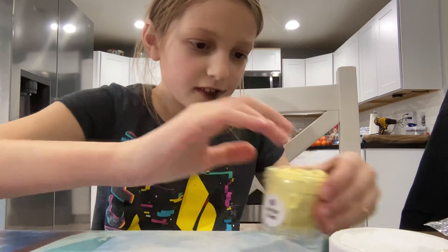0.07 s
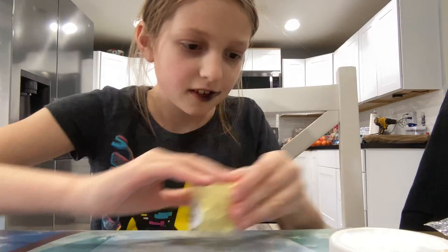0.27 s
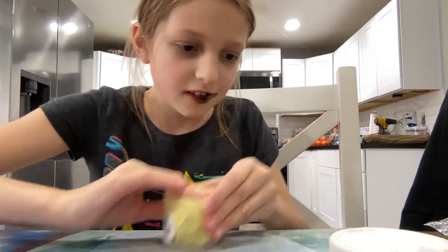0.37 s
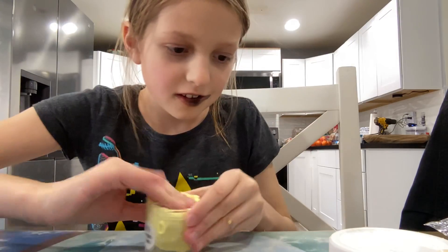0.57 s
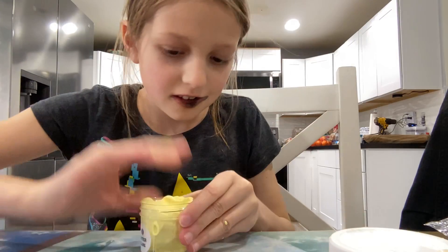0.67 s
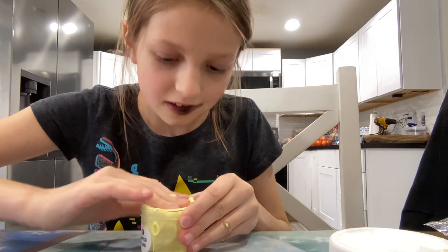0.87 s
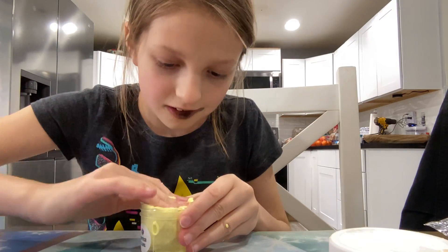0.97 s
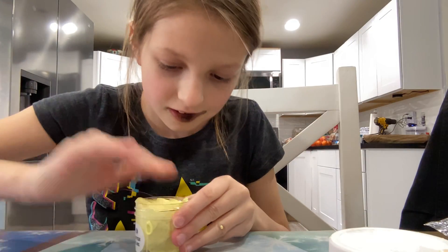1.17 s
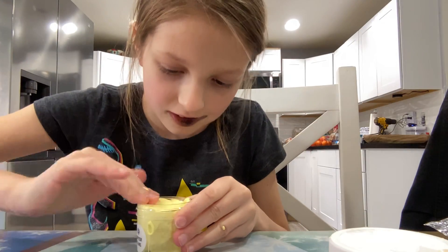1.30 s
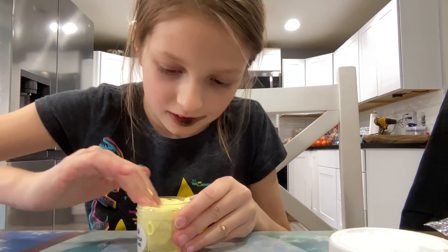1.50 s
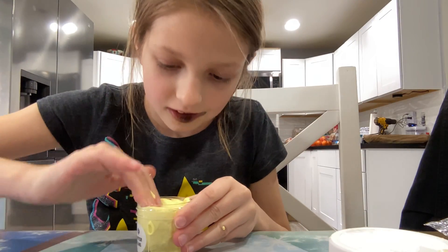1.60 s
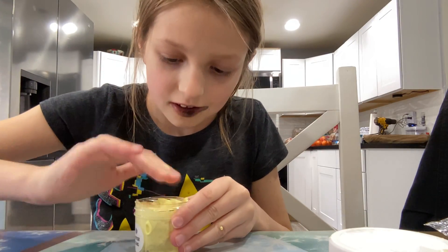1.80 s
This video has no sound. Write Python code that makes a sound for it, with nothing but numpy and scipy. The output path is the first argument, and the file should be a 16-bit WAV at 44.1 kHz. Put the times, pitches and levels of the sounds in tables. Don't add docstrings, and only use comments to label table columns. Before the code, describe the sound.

Close, dry handling of sticky slime in a plastic jar, with crackly pops, a jar landing with a knock and quick clicks, then quiet thuds, peeling rustles and two late clicks over low room hum.

```python
import sys
import numpy as np
from scipy import signal
from scipy.fft import rfft, irfft
from scipy.io import wavfile
from scipy.ndimage import uniform_filter1d

SR = 44100
rng = np.random.default_rng(int(sys.argv[2]) if len(sys.argv) > 2 else 0)


def materialize(psi):
    bounded = np.clip(np.atleast_2d(psi).T, -1, 1)
    quanta = np.round(bounded * 32767).astype(np.int16)
    wavfile.write(sys.argv[1], SR, quanta)


def elevation(decibels):
    levels = np.asarray(decibels, float)
    return 10 ** (levels / 20)


N = 81585
TIME_S = np.arange(N) / SR


def noise():
    return rng.standard_normal(N)


def colour(x, points):
    hz, db = np.array(points, float).T
    f = np.maximum(np.fft.rfftfreq(len(x), 1 / SR), 1)
    low_cut_db = 24 * np.log2(np.maximum(hz[0] / f, 1))
    gain_db = np.interp(np.log(f), np.log(hz), db) - low_cut_db
    y = irfft(rfft(x) * elevation(gain_db), len(x))
    return y / np.sqrt(np.mean(y ** 2))


def fade(start_s, t60_s, rise_s=0.000083):
    since_s = np.maximum(TIME_S - start_s, 0)
    rise = 1 - np.exp(-(since_s / rise_s) ** 2)
    return since_s, rise * np.exp(-np.log(1000) * since_s / t60_s)


def ringing(start_s, hz, db, t60_s, rise_s=0.00011):
    since_s, env = fade(start_s, t60_s, rise_s)
    return elevation(db) * env * np.sin(2 * np.pi * hz * since_s)


def peel_envelope(start_s, rise_s, hold_s, fall_s):
    growth = np.clip((TIME_S - start_s) / rise_s, 0, 1) ** 2
    falling_s = np.maximum(TIME_S - start_s - rise_s - hold_s, 0)
    return growth * np.exp(-3 * falling_s / fall_s)


def walk(rate_hz):
    k = int(SR / rate_hz)
    steps = np.repeat(rng.standard_normal(N // k + 1), k)
    return 0.71 * uniform_filter1d(uniform_filter1d(steps, k), k)[:N]


# start in seconds, peak in dB, jar wall modes in dB.
CLICKS = [
    (0.4383, -19, 2.5),
    (0.4482, -20.5, -26),
    (0.461, -19.5, -7.5),
    (0.5592, -18, -5),
    (1.334, -20, -5.5),
    (1.4257, -21, -6),
]
# frequency in Hz, level in dB, t60 in seconds.
WALL_MODES = [(868, -8, .025), (1140, -8, .022), (1730, -17.5, .02), (2060, -16, .02)]
# frequency in Hz, level in dB, t60 in seconds.
RING_MODES = [(3080, -15, .02), (4500, -22, .012), (5270, -11, .017), (6620, -22, .07), (6740, -15, .02),
              (7630, -16, .02), (8655, -17, .015), (8845, -23, .06), (9730, -24, .04), (10560, -21, .05),
              (11060, -7, .05), (12500, -30, .04), (13250, -17, .022), (14650, -24, .022)]
# frequency in Hz, level in dB.
CRACK_COLOUR = [(750, -7.5), (1300, -17), (2600, -16), (5000, -20), (8500, -3.5), (10500, -18.5),
                (12300, -45.5), (15500, -40.5)]


def ring_clicks():
    rise_s, scatter_db, mode_gain_db = 0.00023, 1.5, -6
    snap_hz, snap_db, snap_t60_s = 10635, 4, 0.0044
    rebound_s, rebound_db = 0.0012, -9
    crack_db, crack_t60_s = -17.5, 0.017
    all_modes = WALL_MODES + RING_MODES
    chance = rng.standard_normal((len(CLICKS), len(all_modes)))
    grit = colour(noise(), CRACK_COLOUR)
    snaps, modes = np.zeros(N), np.zeros(N)
    for (start_s, db, wall_db), luck in zip(CLICKS, chance):
        snaps += ringing(start_s, snap_hz, db + snap_db, snap_t60_s, rise_s)
        snaps += ringing(start_s + rebound_s, snap_hz, db + snap_db + rebound_db, snap_t60_s, rise_s)
        modes += elevation(db + crack_db) * fade(start_s, crack_t60_s, rise_s)[1] * grit
        for k, (hz, mode_db, t60_s) in enumerate(all_modes):
            level_db = db + mode_db + mode_gain_db + scatter_db * luck[k]
            if k < len(WALL_MODES):
                level_db += wall_db
            modes += (-1) ** k * ringing(start_s, hz, level_db, t60_s, rise_s)
    return snaps, modes


# start in seconds, peak in dB, t60 in seconds, low part in dB.
POPS = [(0.2348, -46, 0.025, -11), (0.2369, -23.5, 0.023, -13.5), (0.2393, -27, 0.041, -14),
        (0.253, -40, 0.14, -36.5), (0.3318, -22, 0.0097, -34), (0.345, -46, 0.056, -33),
        (.3815, -21, 0.014, -10), (0.4076, -30.5, 0.025, 3), (0.4398, -19.5, 0.0091, 10),
        (.585, -38.5, 0.013, 6.5), (0.6034, -38.5, 0.049, -9), (0.616, -34, 0.015, -10),
        (0.6417, -53.5, 0.071, 13.5), (0.6625, -44, 0.031, 7), (0.8363, -62.5, 0.1, 8),
        (0.9409, -24.5, 0.013, -14.5), (0.952, -45.5, 0.085, -27.5), (0.983, -44.5, .02, -33.5),
        (1.064, -56, 0.025, -9), (1.0848, -43, 0.015, -12.5), (1.279, -59.5, 0.027, 0.5),
        (1.5481, -56, 0.084, -1.5), (1.7393, -66, .015, 12.5)]
# frequency in Hz, level in dB.
POP_COLOUR = [(1470, -64), (2500, -32), (4510, -16), (5480, -1), (6010, -6), (10500, 5.5), (13900, -21),
              (16000, -54.5)]
# frequency in Hz, level in dB.
POP_LOW_COLOUR = [(520, -0.5), (900, -1.5), (1300, -9), (1900, -6), (3200, -7.5), (5000, -19)]
# frequency in Hz, level in dB.
TICK_COLOUR = [(6500, -17.5), (9000, -3), (10600, 1.5), (12500, -9), (15000, -34.5)]


def pops():
    grit = noise() * elevation(2.8 * walk(1500))
    bright, tick, low = (colour(grit, c) for c in (POP_COLOUR, TICK_COLOUR, POP_LOW_COLOUR))
    out = np.zeros(N)
    for start_s, db, t60_s, low_db in POPS:
        small = db < -44.5
        env = fade(start_s, t60_s, 0.001 if small else 0.0002)[1]
        out += elevation(db - 9.5) * env * ((tick if small else bright) + elevation(low_db) * low)
    return out


# start in seconds, peak in dB, pitch in Hz, t60 in seconds.
PLOPS = [(0.2368, -50.5, 882, .02), (0.2405, -41.5, 500, 0.023), (.8355, -55, 920, .02),
         (.8362, -60.5, 2300, .012), (.428, -28, 650, .03), (.471, -38, 680, .03), (.4075, -42, 1150, .015),
         (.458, -34, 250, .03), (.939, -53, 550, 0.022), (1.2805, -49, 620, .02), (1.2805, -58, 1700, .012),
         (0.2381, -50, 1697, 0.029), (0.3828, -34.5, 1280, 0.022), (0.3816, -29.5, 4220, 0.0095),
         (0.9399, -50, 1810, 0.014), (0.9398, -48.5, 2500, 0.016), (.9412, -58, 3950, 0.01),
         (1.137, -54, 1804, 0.02)]


def plops():
    return sum(ringing(start_s, hz, db, t60_s, 0.0012) for start_s, db, hz, t60_s in PLOPS)


# start, rise, hold and fall in seconds, level in dB.
RUSTLES = [
    (-.02, 0.0099, 0.061, 0.038, -69.5),
    (0.274, .005, 0.015, 0.16, -69),
    (0.372, 0.026, 0.03, 0.2, -51.5),
    (0.563, 0.037, 0.074, 0.023, -60),
    (0.828, .01, 0.031, .04, -77.5),
    (0.933, 0.0054, 0.02, 0.088, -65.5),
    (1.059, 0.055, 0.023, 0.031, -54.5),
]
# frequency in Hz, level in dB.
RUSTLE_COLOUR = [(600, -10), (1100, -2.5), (1900, -7), (3500, -10.5), (6500, -8.5), (10500, 1),
                 (13000, -16), (16000, -28)]


def rustle():
    grains_per_s, grain_spread_db, patchy_db = 14000, 1.5, 1.8
    hits = rng.random(N) < grains_per_s / SR
    grains = hits * elevation(grain_spread_db * rng.exponential(size=N)) * noise()
    env = sum(elevation(db) * peel_envelope(*times_s) for *times_s, db in RUSTLES)
    return env * elevation(patchy_db * walk(120)) * colour(grains, RUSTLE_COLOUR)


# start, rise and fall in seconds, level in dB, centre in Hz.
FIZZ = [(-.005, 0.0099, 0.041, -60.5, 7040), (.0125, .001, 0.0088, -56.5, 5530),
        (.027, .004, 0.048, -62, 11500), (.03, 0.0073, 0.047, -66.5, 6330),
        (.855, .004, 0.026, -68.5, 11970), (.882, 0.0018, 0.0093, -68.5, 7800),
        (.95, .005, 0.082, -60, 8550), (1.11, .003, .02, -57, 10000), (1.1, .035, .04, -59, 1700),
        (1.105, .03, .03, -63, 5000), (1.09, .04, .06, -60, 10500), (1.275, .004, .05, -72, 10500),
        (1.547, 0.0017, 0.025, -67.5, 6000), (1.638, .008, 0.07, -67.5, 10000),
        (1.688, 0.00094, .015, -61.5, 10540), (1.702, .001, 0.014, -65, 10500),
        (1.713, 0.021, 0.033, -62, 10050)]


def fizz():
    wide, slope_db = 2 ** 0.5, -15
    grit = noise() * elevation(3.2 * walk(900))
    out = np.zeros(N)
    for start_s, rise_s, fall_s, db, hz in FIZZ:
        band = [(hz / wide, slope_db), (hz, 0), (hz * wide, 2 * slope_db), (hz * wide ** 2, -70)]
        out += elevation(db) * peel_envelope(start_s, rise_s, 0, fall_s) * colour(grit, band)
    return out


# frequency in Hz, level in dB, t60 in seconds.
BASE_MODES = [(290, -24, 0.03), (382.2, -24, 0.056), (661, -15.5, 0.034), (1140, -39, .02),
              (1418, -26, 0.042), (1950, -13, 0.014)]
# frequency in Hz, level in dB.
SLAP_COLOUR = [(200, 8), (600, 1), (1900, -6), (3500, -14.5), (10000, -15), (14000, -35.5)]


def landing():
    start_s = 0.4194
    slap = elevation(-16) * fade(start_s, 0.031, 0.0021)[1] * colour(noise(), SLAP_COLOUR)
    base = sum(ringing(start_s + 0.000754, hz, db, t60_s, 0.0029) for hz, db, t60_s in BASE_MODES)
    return slap + base


# start in seconds, peak in dB, pitch in Hz, t60 in seconds.
THUDS = [(0.042, -66.5, 94.4, 0.084), (.12, -68, 166, 0.19), (0.391, -47.5, 128, .1),
         (.424, -26, 121.7, 0.12), (0.44, -32, 92, 0.1), (.445, -37, 72, .4), (0.481, -32, 98, 0.2),
         (.553, -49, 96, .15), (.61, -47.5, 107, 0.13), (.602, -49.5, 295, .08), (.86, -47.5, 108, .15),
         (1.22, -56, 76, 0.14), (.05, -58, 220, .08), (1.4, -66, 690, .3), (0.657, -49, 75, 0.17),
         (.65, -47, 290, 0.12), (.846, -42.5, 127, 0.13), (0.844, -44.5, 261, 0.092),
         (0.889, -44, 104.6, 0.2), (.935, -53.5, 91, 0.17), (1.131, -48, 279, 0.086),
         (1.148, -50, 104.3, 0.24), (1.282, -46.5, 287.6, 0.12), (1.288, -34.5, 113, 0.082),
         (1.338, -37.5, 89, 0.058), (1.512, -55, 290, 0.17), (1.552, -65, 108.6, 0.28),
         (1.744, -51, 139, 0.11), (1.746, -56.5, 290, 0.072), (1.041, -62.5, 96, 0.46),
         (.07, -88, 248, 0.15), (1.782, -60, 94, 0.24)]
# frequency in Hz, level in dB.
RUMBLE_COLOUR = [(70, 2.5), (140, 1), (300, -6), (600, -14), (1200, -30.5), (3000, -69)]


def thuds():
    rise_turns = 0.39
    rumble = elevation(-11.5) * colour(noise(), RUMBLE_COLOUR)
    out = np.zeros(N)
    for start_s, db, hz, t60_s in THUDS:
        rise_s = rise_turns / hz
        out += ringing(start_s, hz, db, t60_s, rise_s)
        out += elevation(db) * fade(start_s, t60_s, rise_s)[1] * rumble
    return out


# frequency in Hz, level in dB.
ROOM_COLOUR = [(100, -2), (700, 4), (3000, -1.5), (6500, -2.5), (10000, -3.5), (16000, -1.5)]


def echo(x, t60_s):
    tail = colour(noise(), ROOM_COLOUR) * fade(0.0041, t60_s, 0.00097)[1]
    tail = tail / np.sqrt(np.sum(tail ** 2))
    return elevation(-11.5) * signal.fftconvolve(x, tail)[:N]


# frequency in Hz, width in Hz, level in dB.
WHINE = [(1150, 250, -89), (2100, 700, -91)]


def whine():
    out = np.zeros(N)
    for hz, width_hz, db in WHINE:
        band = [(hz - width_hz, -30), (hz, 0), (hz + width_hz, -30), (2 * hz, -60)]
        out += elevation(db + 4 * walk(10)) * colour(noise(), band)
    growth_db_per_s = 4.1
    return out * elevation(growth_db_per_s * TIME_S)


# frequency in Hz, level in dB.
HUM_COLOUR = [(60, 2.5), (130, 1), (650, -4.5), (830, -17.5), (2100, -30), (7000, -30), (10500, -24),
              (13500, -36), (14500, -60)]


def hum():
    level_db, growth_db_per_s, swell_db, flicker_db = -68, 1, 1.0, 1.2
    bass_bands, bass_start_db, bass_settle_s = 6, -3, 0.27
    spectrum = rfft(colour(noise(), HUM_COLOUR))
    swell = walk(1.67)
    octave = np.log2(np.maximum(np.fft.rfftfreq(N, 1 / SR), 1) / 30)
    out = np.zeros(N)
    for k in range(10):
        band = irfft(spectrum * np.clip(1 - np.abs(octave - k), 0, 1), N)
        gain_db = swell_db * swell + flicker_db * walk(14.0)
        if k < bass_bands:
            gain_db = gain_db + bass_start_db * np.exp(-TIME_S / bass_settle_s)
        out += band * elevation(gain_db)
    return elevation(level_db + growth_db_per_s * TIME_S) * out


def scene():
    snaps, modes = ring_clicks()
    slime = pops() + plops() + rustle() + landing()
    clicks = snaps + modes + echo(modes + elevation(-2.5) * snaps, 0.19)
    near = clicks + slime + echo(slime, 0.29)
    return (near + thuds() + fizz() + whine() + hum())[None]


def band_limit(x):
    return signal.sosfilt(signal.butter(12, 16530, fs=SR, output="sos"), x)


def record(dry):
    limit = 0.2
    mix = signal.sosfilt(signal.butter(6, 63.5, "high", fs=SR, output="sos"), dry)
    mix = signal.sosfilt(signal.butter(4, 14200, fs=SR, output="sos"), mix)
    mix = signal.sosfilt(signal.ellip(6, 0.2, 30, 16000, fs=SR, output="sos"), mix)
    mix = limit * np.tanh(mix / limit)
    return band_limit(mix)


dry = scene()
out = record(dry)
materialize(out)
```